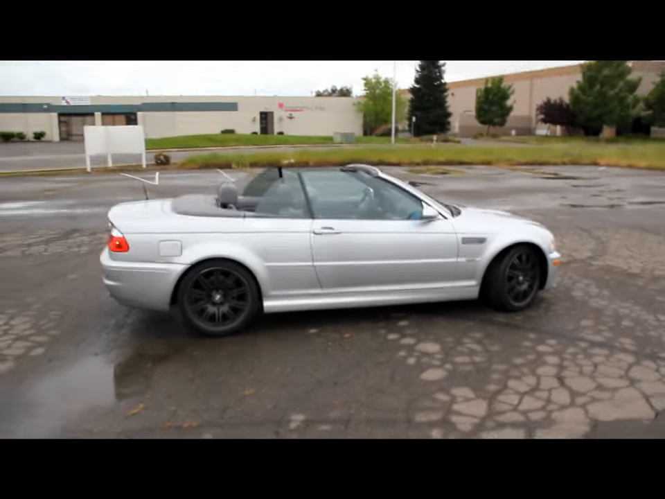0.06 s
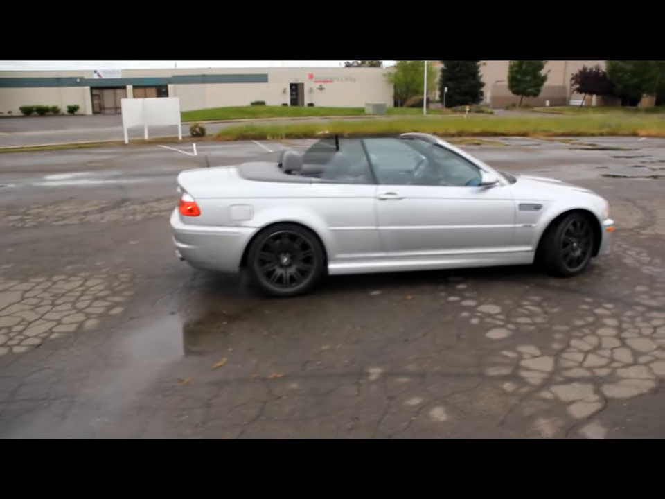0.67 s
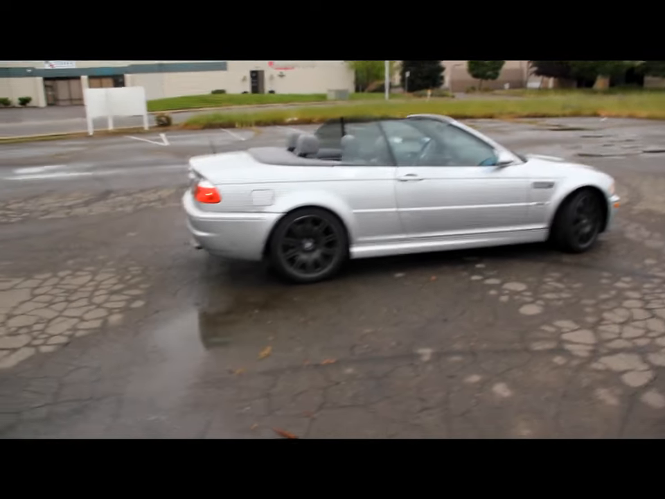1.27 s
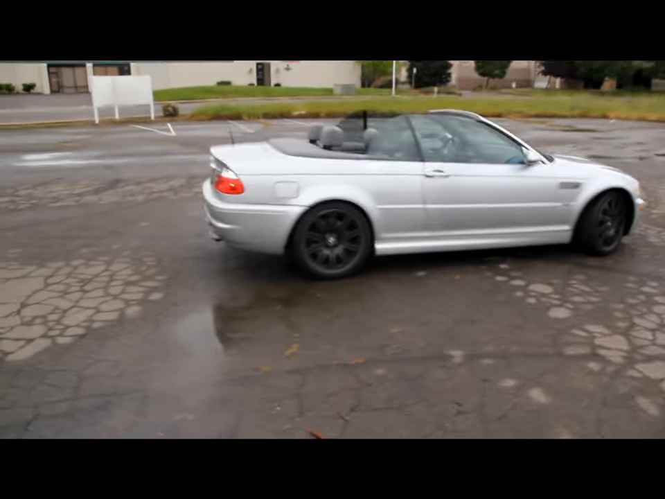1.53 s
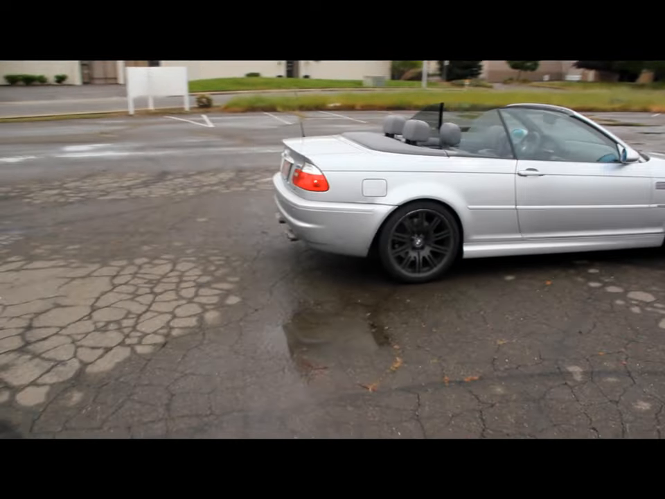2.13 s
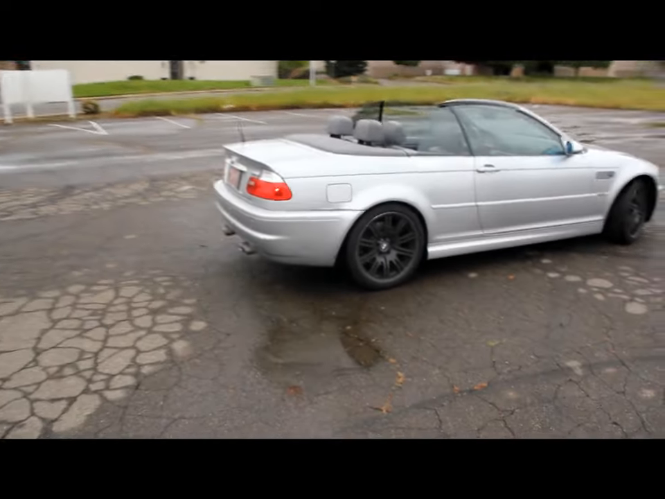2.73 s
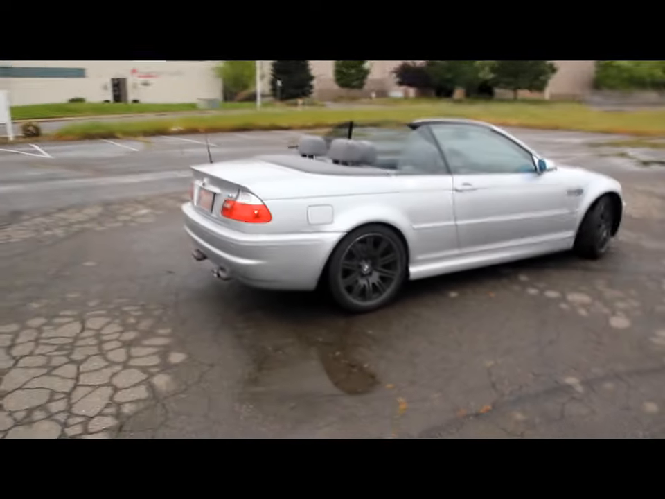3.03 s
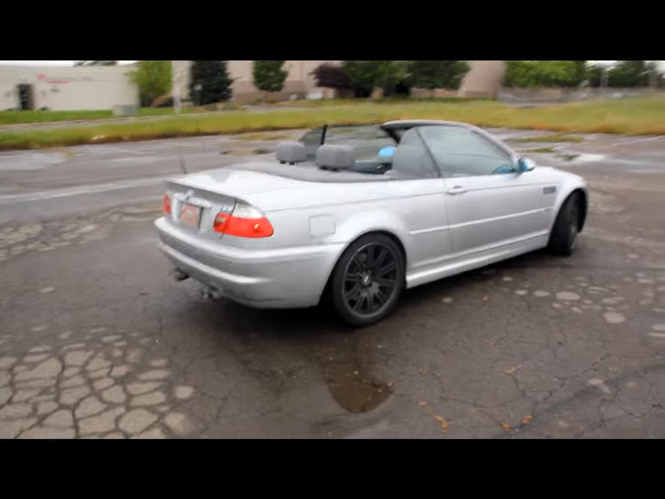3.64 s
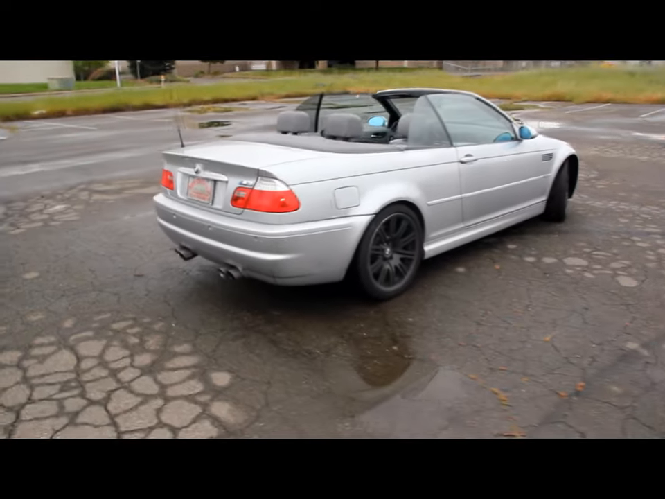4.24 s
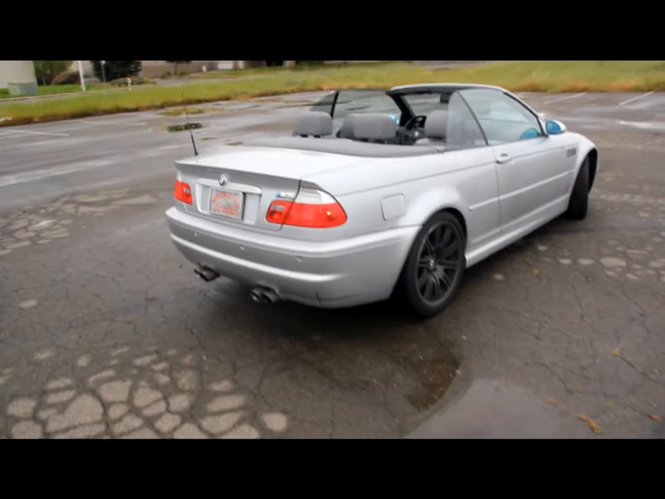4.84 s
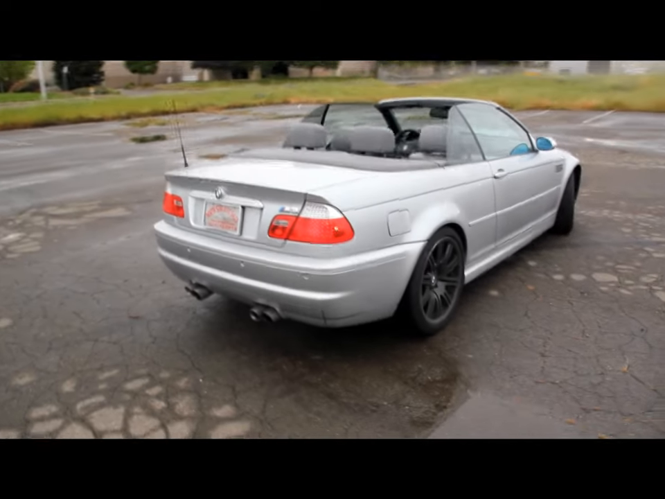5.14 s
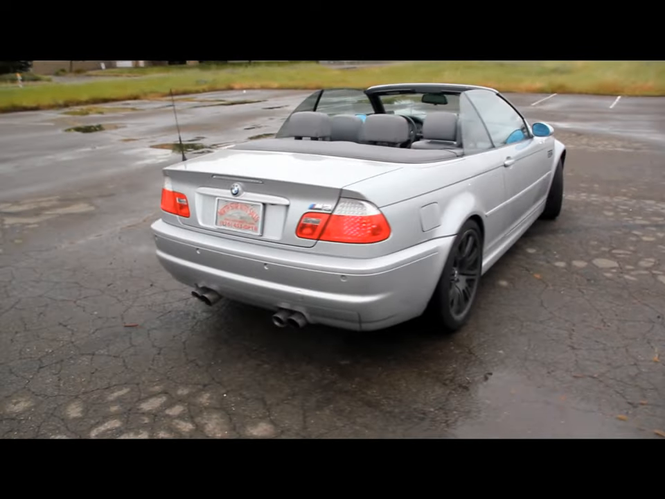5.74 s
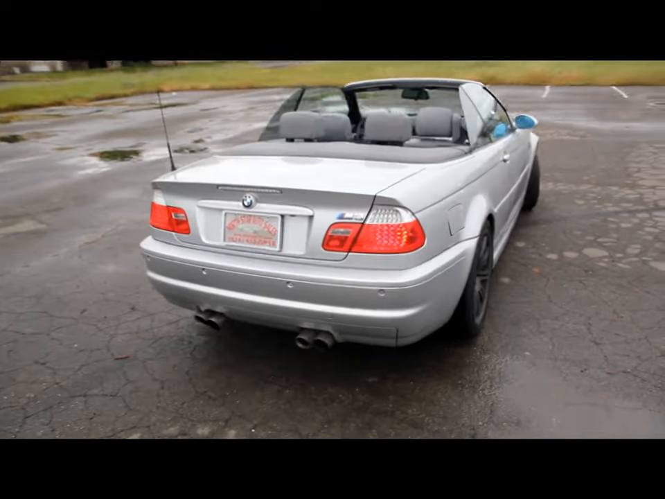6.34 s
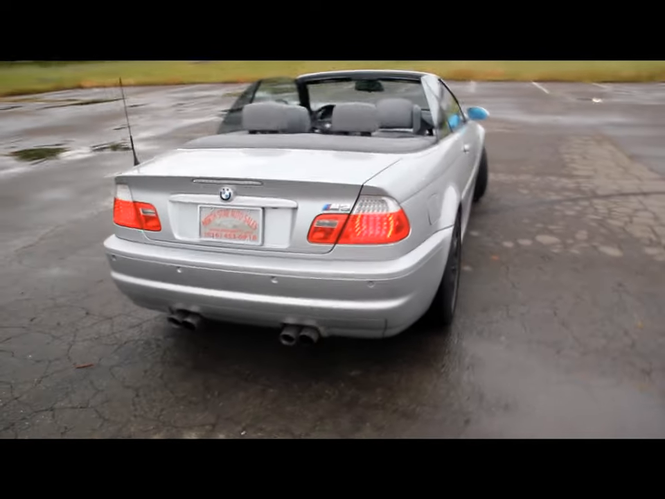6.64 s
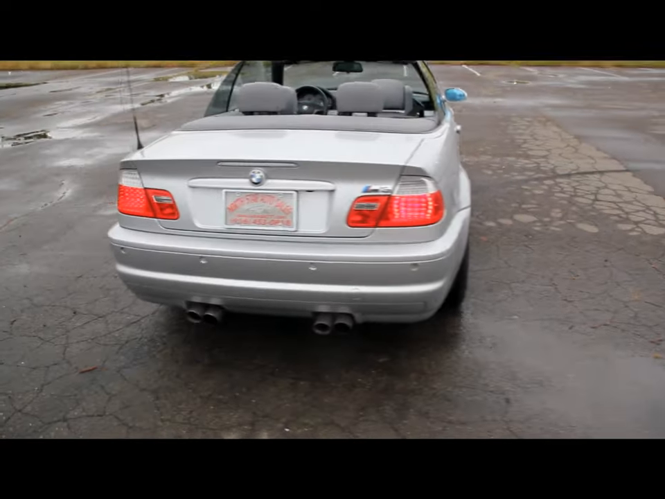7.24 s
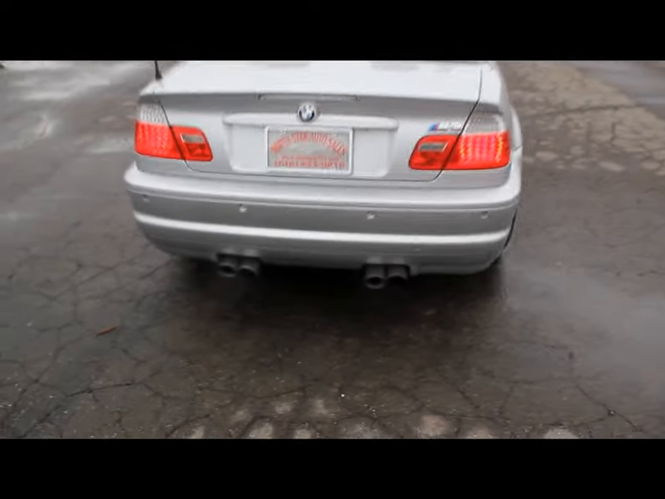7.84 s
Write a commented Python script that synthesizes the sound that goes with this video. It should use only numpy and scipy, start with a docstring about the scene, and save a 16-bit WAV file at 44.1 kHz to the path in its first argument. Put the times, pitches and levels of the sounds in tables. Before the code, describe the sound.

A six-cylinder car idles outdoors through a loud exhaust, making a deep, even drone with light engine clatter, valve ticking and faint belt whines above it. The drone grows louder as a handheld microphone is carried from the side of the car round to the tailpipes. Along the way, shoes faintly crunch grit and scuff wet asphalt, and the microphone takes a few small knocks, with one sharper bump about halfway.

```python
"""The deep drone of a six-cylinder car idling through twin straight pipes on a wet outdoor lot.
Two cylinder banks fire in turn, each into its own ringing pipe. Gas rush, engine clatter, valve
ticking and faint belt whines sit above the drone. The exhaust grows as the microphone is carried
from the side of the car round to the tailpipes, with a few handling knocks, shoe scuffs and grit."""
import sys
import numpy as np
from scipy import signal
from scipy.fft import rfft, irfft
from scipy.io import wavfile

SR = 44100
rng = np.random.default_rng(int(sys.argv[2]) if len(sys.argv) > 2 else 0)


def wrap_up_sound(samples):
    """Save the sound to the file named by the first command line argument, as 16-bit audio."""
    columns = np.atleast_2d(samples).T
    # keep every value between -1 and 1, then stretch to whole-number steps
    tamed = np.clip(columns, -1, 1)
    steps = np.round(tamed * 32767).astype(np.int16)
    wavfile.write(sys.argv[1], SR, steps)


N = 348390
TIME = np.arange(N) / SR
BINS_HZ = np.maximum(np.arange(N // 2 + 1) * SR / N, 1)


# The walk to the tailpipes: time_s, distance_m
MIC_WALK = [(0, 4.04), (1.2, 4.4), (2.6, 3.2), (4.0, 1.86), (5.5, 1.41), (7.2, 1.23), (7.9, 1.03)]
# Bass, drone, honk and overtones: gain_at_1m_db, loss_per_distance_doubling_db
EXHAUST_REGISTERS = [(-21.5, 4), (-13.5, 6), (-29, 4), (-34.5, 1.83)]
def exhaust(turns):
    """Each firing sends a pulse and a turbulent puff down its pipe; the drone grows on approach."""
    doublings = np.log2(in_time(MIC_WALK)[0])
    bass_db, drone_db, honk_db, overtone_db = [db - loss * doublings for db, loss in EXHAUST_REGISTERS]
    honk_db = honk_db + 11.5 * swell(2.21, 0.98)   # carries best beside the rear wheel
    accents = lope(turns, side_share=doublings / doublings.max())
    left, right = [accents * firings(turns, bank, PULSE, delay_s, uneven_db=0.78, jitter_s=.00008)
                   for bank, delay_s in enumerate((0.004904, .0015))]
    pipes = twin_pipes(left, right)
    puffs = fading(left + right, decay_s=0.072) * rng.standard_normal(N)
    # split into registers, which carry differently round the car
    bass, to_drone, to_honk, to_overtones = [signal.sosfiltfilt(butter(8, edge_hz), pipes)
                                             for edge_hz in (111.0, 230.2, 275.5, 366)]
    honk = from_db(-2.5) * rms_one(to_honk - to_drone) + from_db(-12.5) * band(puffs, 218, 265)
    overtones = rms_one(to_overtones - to_honk) + from_db(-6.5) * band(puffs, 292, 345)
    burble = from_db(-36.5) * rms_one(around(puffs, hz=130.5, ratio=1.43))
    return (from_db(bass_db) * rms_one(bass) + from_db(drone_db) * rms_one(to_drone - bass)
            + from_db(honk_db) * honk + from_db(overtone_db) * overtones + burble + buzz(left + right))


# Each pipe's resonances: pitch_hz, width_hz, gain_db
LEFT_PIPE_MODES = [(68.7, 16.2, 6.5), (131, 17.5, 11), (142.26, 22, 14), (206.8, 13.14, 16),
                   (289, 2.66, -3.5), (370.4, 13.5, -11.5)]
RIGHT_PIPE_MODES = [(59.2, 16.6, 10.5), (77.6, 68.2, 7), (146.7, 14.6, 18), (220.04, 11.44, 12.5),
                    (315.4, 17, -6.5)]
def twin_pipes(left, right):
    """Each bank rings its own pipe; the deepest bass is rolled off."""
    ringing = resonate(left, LEFT_PIPE_MODES) + resonate(right, RIGHT_PIPE_MODES)
    return signal.sosfilt(butter(2, 48, "high"), ringing)


# Cylinders in firing order: pulse_db, valve_tick_db, side_accent_db, late_s
FIRING_ORDER = [(2.5, 20, -1.5, .00004), (-0.3, 12.5, 0.6, -.00008), (1.5, 18.5, -0.9, -.00014),
                (0.84, 15.5, 1.64, .00003), (2.5, 15, -0.3, .00017), (-0.44, 14, 0.6, -.00008)]
PULSE, VALVE_TICK, SIDE_ACCENT, LATE = range(4)
def firings(turns, bank, level_column, delay_s, uneven_db, jitter_s):
    """One bank's clicks: the engine fires three times a crank turn, the banks alternating."""
    number = np.arange(bank, int(3 * turns[-1]), 2)
    cylinder = np.array(FIRING_ORDER)[number % len(FIRING_ORDER)]
    jitter, unevenness = rng.standard_normal((len(number), 2)).T
    start_s = np.interp(number / 3, turns, TIME) + delay_s + cylinder[:, LATE] + jitter_s * jitter
    at = np.clip(start_s * SR, 0, N - 1).astype(int)
    clicks = np.zeros(N)
    clicks[at] = from_db(cylinder[:, level_column] + uneven_db * unevenness)
    return clicks


# Firings that hit harder: time_s, boost_db
HARD_FIRINGS = [(2.55, 2), (3.138, 1.5), (6.205, 1.5), (7.06, 2), (7.80, 1.5)]
def lope(turns, side_share):
    """Accents on the firings: from the side the near bank stands out and the idle lopes."""
    side_db = np.array(FIRING_ORDER)[(3 * turns).astype(int) % len(FIRING_ORDER), SIDE_ACCENT]
    hard_db = sum(db * swell(s, .012) for s, db in HARD_FIRINGS)
    return from_db(side_db * side_share + hard_db)


def buzz(pulses, decay_s=0.026):
    """Echoes inside the pipes smear each firing's sharp edge into a buzz above the drone."""
    echoes = rng.standard_normal(SR // 8) * np.exp(-TIME[:SR // 8] / decay_s)
    smeared = around(signal.fftconvolve(pulses, echoes)[:N], hz=534, ratio=1.57)
    return from_db(-46 - 3 * behind_car()) * band(smeared, 420, 885)


# Noise colour beside and behind the car: frequency_hz, gain_db
SIDE_COLOUR = [(350, 1), (520, -8), (720, -8), (890, -15), (1230, -5.5), (1700, -5), (2800, -8.5),
               (4500, -14), (7200, -17), (9000, -35.5), (11000, -26.5), (13000, -30), (15500, -33.5)]
REAR_COLOUR = [(390, -4), (490, 7), (650, 2.5), (850, -3), (1200, 5.5), (2100, 0), (2750, -1), (3800, -9),
               (5500, -17), (6500, -15), (7800, -17.5), (9000, -22), (10500, -18), (12000, -22),
               (15500, -22)]
# Engine parts ringing with the clatter: pitch_hz, width_hz, gain_db
CLATTER_MODES = [(1222, 62, 18.5), (1680, 45, 13), (1864, 45, 11), (2715, 60, 11.5), (3310, 66, 8.5),
                 (3847, 45, 9), (4790, 200, 5.5), (6240, 60, 6)]
# The engine bay fades as the car's body screens it: time_s, relative_db
BAY_FADE = [(0.0, -41.5), (1.36, -42.5), (1.96, -45.5), (3.76, -43.5), (4.55, -45.5), (4.82, -47.5),
            (5.5, -48.5), (7.9, -47)]
# Gas rush, clatter, hiss, ticking: low_hz, high_hz, base_db, bay_share, rear_change_db, pulse_share
ENGINE_BANDS = [(412, 983, -39, 0.096, -2.5, 0.23), (984, 3440, -41, 0.47, 0, 0.082),
                (3650, 9140, -43.5, 0.5, -1, 0.23), (8330, 16200, -49.5, 0.92, -2, 0.71)]
def engine_noise(valve_beat):
    """Gas rush and clatter pulse lightly with the valves; the top treble is mostly their ticking."""
    bay_db, = in_time(BAY_FADE)
    bay_swing_db = bay_db - bay_db.mean()
    beside = coloured(SIDE_COLOUR, ripple_db=1.6) + from_db(-8.5) * ringing_noise(CLATTER_MODES)
    behind = coloured(REAR_COLOUR, ripple_db=2.6)
    rear = behind_car()
    out = 0
    for low_hz, high_hz, base_db, bay_share, rear_change_db, pulse_share in ENGINE_BANDS:
        noise = np.sqrt(1 - rear) * band(beside, low_hz, high_hz)
        noise += np.sqrt(rear) * band(behind, low_hz, high_hz)
        level_db = base_db + bay_share * bay_swing_db + rear_change_db * rear + .5 * drift(10)
        pulsing = np.sqrt(1 - pulse_share + pulse_share * valve_beat ** 2)
        out += from_db(level_db) * noise * pulsing
    return out


def valve_envelope(turns):
    """The valves' rhythm: a quick rise and fall for every tick."""
    ticks = sum(firings(turns, bank, VALVE_TICK, delay_s, uneven_db=1.7, jitter_s=0.00032)
                for bank, delay_s in enumerate((-.002, .001)))
    return rms_one(fading(fading(ticks, decay_s=0.0024), decay_s=0.012))


def valve_ticking(valve_beat):
    """The finest ticking of the valves, clearest abreast of the engine."""
    return from_db(-52) * swell(1.4, .8) * valve_beat * band(rng.standard_normal(N), 9800, 13400)


# Low engine hums and thin belt whines: cycles_per_turn, loudest_s, spread_s, level_db
ENGINE_HUMS = [(18, 1.9, .6, -41), (24, 2, 3.2, -47.5), (27, .7, .9, -41.5), (27, 3.8, 1.3, -41.5),
               (27, 7.64, .47, -45.5), (28.5, 3, 5, -50), (35, 3.7, 1.2, -44.5)]
BELT_WHINES = [(93.8, 2.25, 1.2, -48), (132.4, 2.35, 0.58, -43.5), (133.2, 0.2, 0.86, -46.5),
               (151.8, 1.15, 1.0, -49), (200.2, .3, .7, -52)]
def hums_and_whines(turns):
    """Wavering tones locked to the crank, each swelling and fading as the microphone passes."""
    out = 0
    for per_turn, loudest_s, spread_s, db in ENGINE_HUMS + BELT_WHINES:
        phase = 2 * np.pi * per_turn * turns + 0.0053 * per_turn * drift(25)
        out += from_db(db + 1.6 * drift(15)) * swell(loudest_s, spread_s) * np.sin(phase)
    return out


# Whirrs along the walk: pitch_hz, width_hz, loudest_s, spread_s, level_db
PASSING_WHIRRS = [(3450, 560, 0.17, 0.45, -42.5), (2610, 180, 0.44, 2, -46.5),
                  (2700, 200, 8.04, 1.4, -48.5)]
def whirrs():
    """Narrow bands of noise, rougher than the whines, that come and go."""
    return sum(from_db(db) * swell(loudest_s, spread_s) * ringing_noise([(hz, width_hz, 0)])
               for hz, width_hz, loudest_s, spread_s, db in PASSING_WHIRRS)


def chirp(turns, pitch_hz=3700, width_hz=120, cycle_phase=0.595):
    """A faint ring excited once every two crank turns, heard briefly behind the car."""
    cycle = np.cos(np.pi * turns - 2 * np.pi * cycle_phase)
    gate = np.exp(12 * (cycle - 1))
    return from_db(-41) * swell(6.74, 0.3) * gate * ringing_noise([(pitch_hz, width_hz, 0)])


# Bumps on the microphone: start_s, peak_db, pitch_hz, band_edge_ratio
MIC_KNOCKS = [(2.287, -26, 1060, 1.1), (3.706, -21, 950, 1.4), (4.3492, -4, 840, 1.6),
              (5.0937, -19.5, 890, 1.13), (5.2118, -20.5, 1050, 1.33), (5.792, -21, 1510, 1.25),
              (5.896, -27, 886, 1.15), (6.038, -25, 1270, 1.15)]
def handling_knocks():
    """Single knocks on the microphone's housing, dulled by the soft contact."""
    out = np.zeros(N)
    for start_s, peak_db, hz, ratio in MIC_KNOCKS:
        knock = -around(signal.unit_impulse(SR // 8), hz, ratio)
        add_hit(out, start_s, peak_db, signal.sosfilt(butter(2, 2400), knock))
    return out


# Grit underfoot: start_s, peak_db, pitch_hz, decay_s
GRIT_CRUNCHES = [(2.187, -18, 3950, 0.0016), (3.125, -24, 2400, 0.011), (3.509, -25, 1880, 0.0044),
                 (3.611, -29, 9000, .002), (3.704, -21, 4200, .009), (3.729, -28, 7600, 0.0099),
                 (5.283, -26, 7350, 0.0014), (5.685, -28, 3000, .008), (5.787, -24.5, 1510, 0.029),
                 (6.012, -25.5, 3020, 0.018), (6.871, -27, 4900, 0.0027), (7.268, -33, 12500, .004),
                 (7.47, -28, 3000, 0.011), (7.495, -32, 11000, 0.041), (7.84, -25.5, 3330, .013)]
def grit():
    """Grit cracks under the shoes in short bursts of uneven grains."""
    out, age = np.zeros(N), TIME[:SR // 8]
    for start_s, peak_db, hz, decay_s in GRIT_CRUNCHES:
        grains = rng.standard_normal(len(age)) * from_db(4.2 * rng.standard_normal(len(age)))
        add_hit(out, start_s, peak_db, around(grains * np.exp(-age / decay_s), hz, ratio=1.28))
    return out


# Resonances of a sole's grind, rasp and wet hiss: pitch_hz, width_hz, gain_db
GRIND_MODES = [(765, 400, 4), (1290, 760, 5)]
RASP_MODES = [(1850, 260, -6), (2153, 110, -2)]
HISS_MODES = [(1290, 540, -1), (3320, 2100, -4.5), (4820, 560, 2.5), (6600, 1800, -11)]
# Soles dragging on wet asphalt: loudest_s, spread_s, grind_db, hiss_db
SOLE_DRAGS = [(3.725, 0.033, -35, -41), (4.565, 0.15, -43, -33.5), (6.17, 0.047, -38, -49)]
# Soles pivoting: start_s, end_s, level_db
SOLE_PIVOTS = [(4.52, 4.66, -42), (6.192, 6.543, -38.5), (6.73, 6.8, -44)]
def shoe_scuffs(fade_s=.03):
    """A dragged sole grinds in uneven slips and squeezes out a wet hiss; a pivoting one rasps."""
    grind = rms_one(around(ringing_noise(GRIND_MODES), hz=1000, ratio=1.9))
    rasp = rms_one(around(ringing_noise(RASP_MODES), hz=1950, ratio=1.3))
    hiss = rms_one(around(ringing_noise(HISS_MODES), hz=3000, ratio=2.8))
    slips = rms_one(from_db(2.9 * drift(150)))
    out = 0
    for loudest_s, spread_s, grind_db, hiss_db in SOLE_DRAGS:
        out += swell(loudest_s, spread_s) * (slips * from_db(grind_db) * grind + from_db(hiss_db) * hiss)
    for start_s, end_s, db in SOLE_PIVOTS:
        gate = (np.tanh((TIME - start_s) / fade_s) - np.tanh((TIME - end_s) / fade_s)) / 2
        out += from_db(db) * gate * rasp
    return out


def behind_car(start_s=3.75, takes_s=2.9):
    """How far the microphone has come round the rear corner, 0 to 1."""
    return np.clip((TIME - start_s) / takes_s, 0, 1)


def from_db(db):
    """Decibels to gain."""
    return 10 ** (np.asarray(db) / 20)


def rms_one(x):
    """Scale to rms 1."""
    return x / np.sqrt(np.mean(x ** 2) + 1e-20)


def in_time(rows):
    """Each column of a curve at every sample."""
    times_s, *columns = np.transpose(rows)
    return [np.interp(TIME, times_s, column) for column in columns]


def swell(loudest_s, spread_s):
    """A bell-shaped rise and fall."""
    return np.exp(-((TIME - loudest_s) / spread_s) ** 2)


def drift(rate_hz):
    """Random wander at rms 1."""
    points = rng.standard_normal(4000)
    return rms_one(np.interp(TIME * rate_hz, np.arange(len(points)), points))


def fading(clicks, decay_s):
    """Each click becomes an envelope that dies away."""
    return signal.lfilter([1], [1, -np.exp(-1 / (decay_s * SR))], clicks + 1e-18)


def butter(order, edge_hz, kind="low"):
    """Filter sections with a flat passband."""
    return signal.butter(order, edge_hz, kind, fs=SR, output="sos")


def band(x, low_hz, high_hz):
    """One band with steep edges, at rms 1."""
    gain = ((1 + (low_hz / BINS_HZ) ** 24) * (1 + (BINS_HZ / high_hz) ** 24)) ** -.5
    return rms_one(irfft(rfft(x) * gain, N))


def around(x, hz, ratio):
    """Gentle band-pass from hz / ratio to hz * ratio."""
    return signal.sosfilt(butter(2, [hz / ratio, min(hz * ratio, .45 * SR)], "band"), x)


def resonate(x, modes):
    """Parallel resonances of alternating sign."""
    out = 0
    for k, (hz, width_hz, db) in enumerate(modes):
        radius = np.exp(-np.pi * width_hz / SR)
        feedforward = (1 - radius ** 2) / 2 * np.array([1, 0, -1])
        feedback = [1, -2 * radius * np.cos(2 * np.pi * hz / SR), radius ** 2]
        out += (-1) ** k * from_db(db) * signal.lfilter(feedforward, feedback, x + 1e-18)
    return out


def ringing_noise(modes):
    """White noise through resonances, at rms 1."""
    return rms_one(resonate(rng.standard_normal(N), modes))


def coloured(spectrum, ripple_db):
    """Noise with the given spectrum, rippled by the many close resonances of panels and pipes."""
    hz, db = np.transpose(spectrum)
    ripple = np.interp(BINS_HZ / 75, np.arange(600), rng.standard_normal(600))
    ripple *= np.clip(BINS_HZ / 2000, 0, 1)
    gain = from_db(np.interp(np.log(BINS_HZ), np.log(hz), db) + ripple_db * ripple)
    return rms_one(irfft(rfft(rng.standard_normal(N)) * gain, N))


def add_hit(out, start_s, peak_db, sound):
    """Mix in a short sound at the given peak level."""
    at = int(start_s * SR)
    out[at:at + len(sound)] += from_db(peak_db) * sound[:N - at] / np.abs(sound).max()


# The gently wandering idle: time_s, speed_rpm
IDLE_SPEED = [(0.0, 986.2), (0.5, 982.9), (1.1, 979.3), (2.0, 964.5), (2.7, 976.4), (3.4, 980.9),
              (4.2, 979.5), (5.0, 974.7), (5.8, 977.6), (6.6, 983.0), (7.2, 976.7), (7.9, 970.7)]
def scene():
    """The car, timed by its crank, mixed in mono with the sounds of the walk."""
    turns = np.cumsum(in_time(IDLE_SPEED)[0]) / 60 / SR
    car = exhaust(turns)
    valve_beat = valve_envelope(turns)
    car += engine_noise(valve_beat) + valve_ticking(valve_beat)
    car += hums_and_whines(turns) + whirrs() + chirp(turns)
    return (car + handling_knocks() + grit() + shoe_scuffs())[None]


def record(dry, cutoff_hz=15700):
    """A steep low-pass takes off the very top."""
    return signal.sosfilt(signal.ellip(12, .1, 90, cutoff_hz, fs=SR, output="sos"), dry)


dry = scene()
out = record(dry)
wrap_up_sound(out)
```